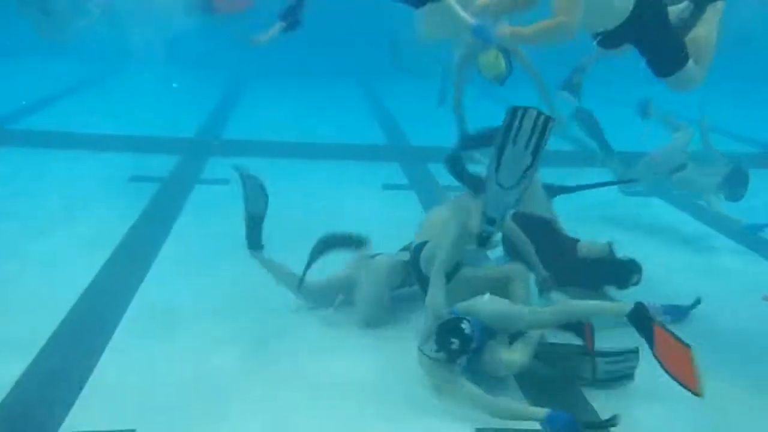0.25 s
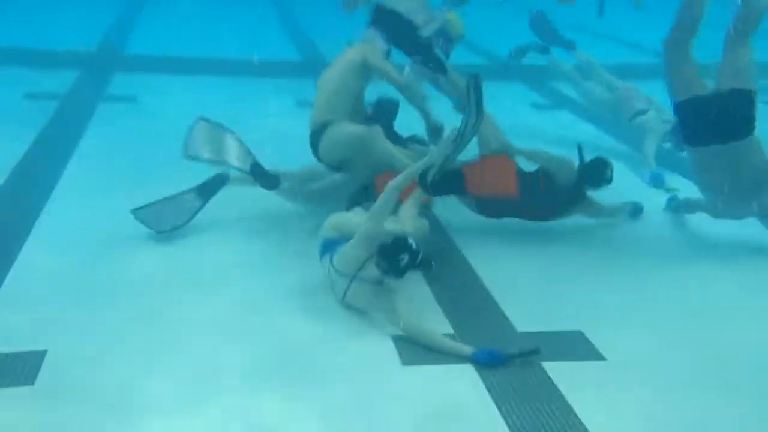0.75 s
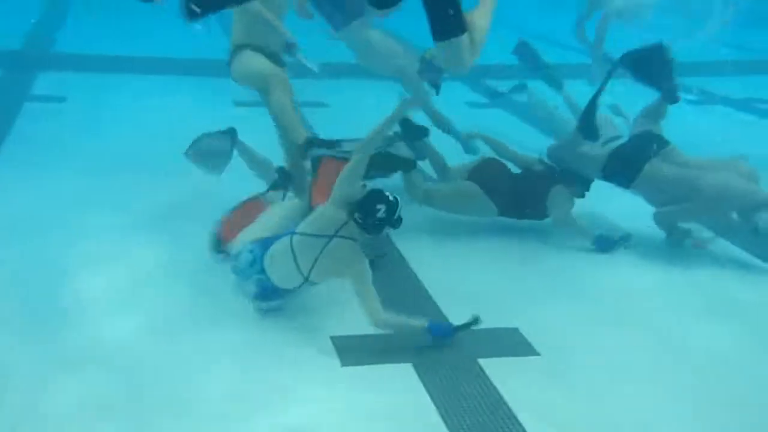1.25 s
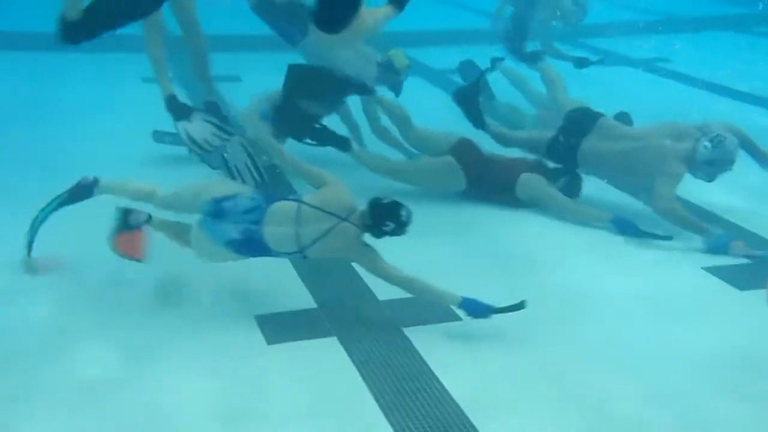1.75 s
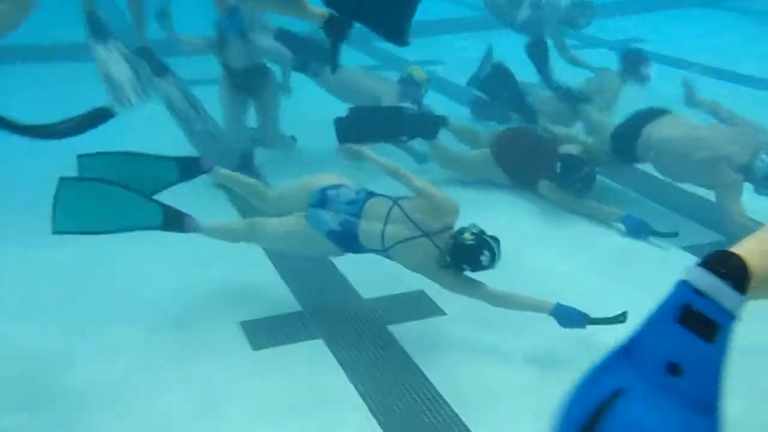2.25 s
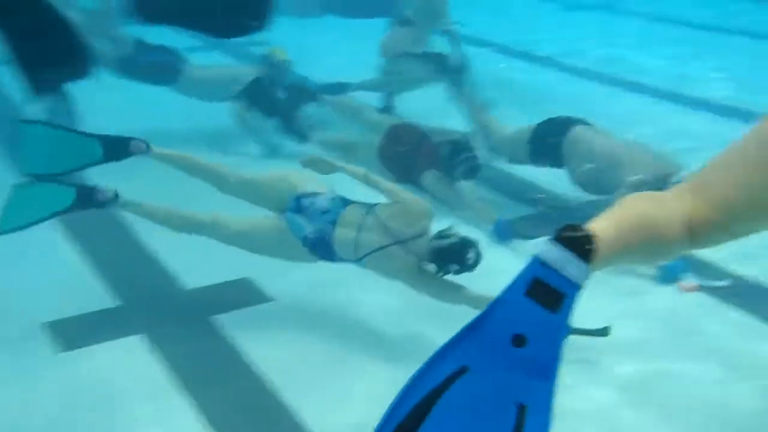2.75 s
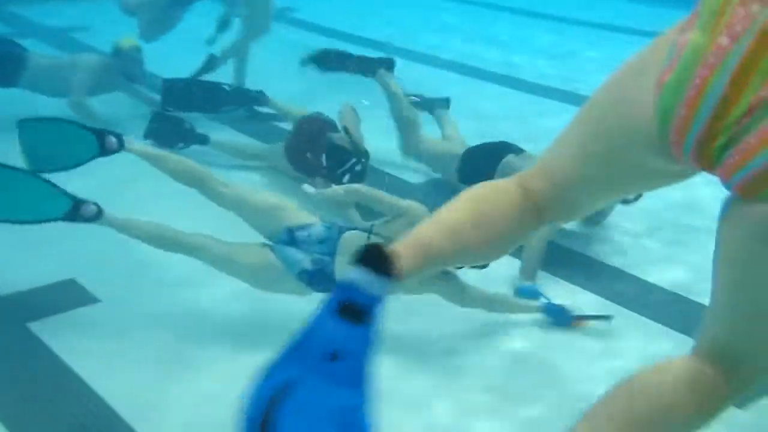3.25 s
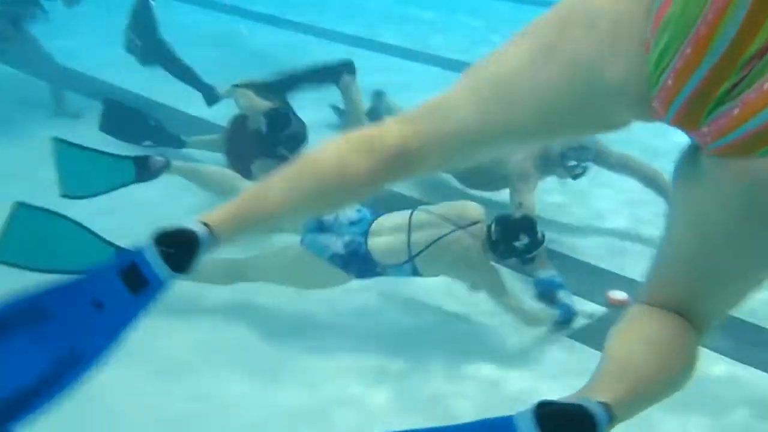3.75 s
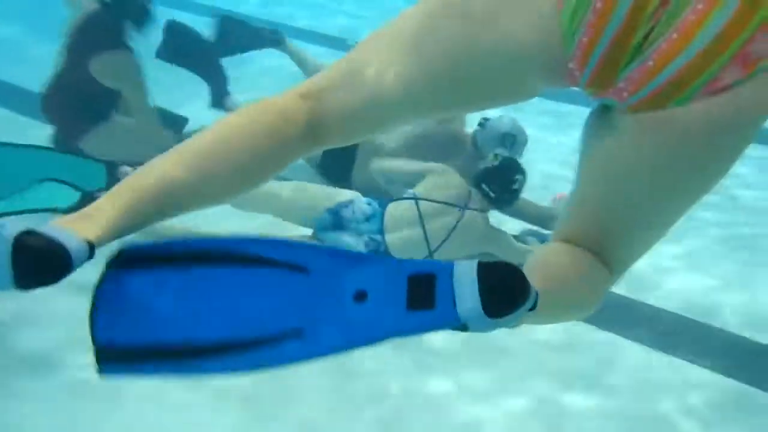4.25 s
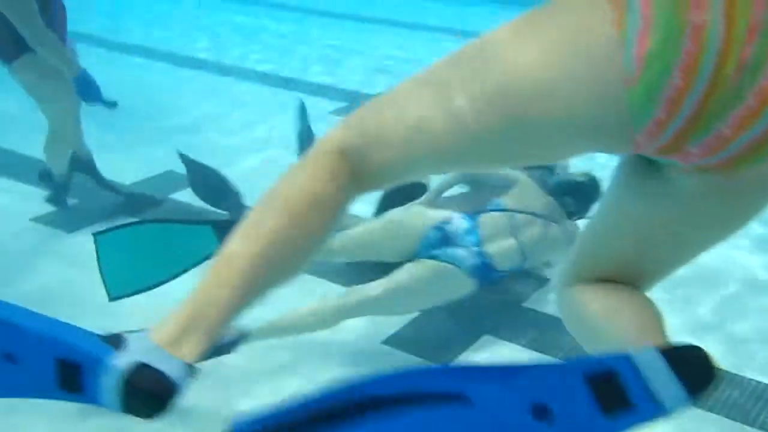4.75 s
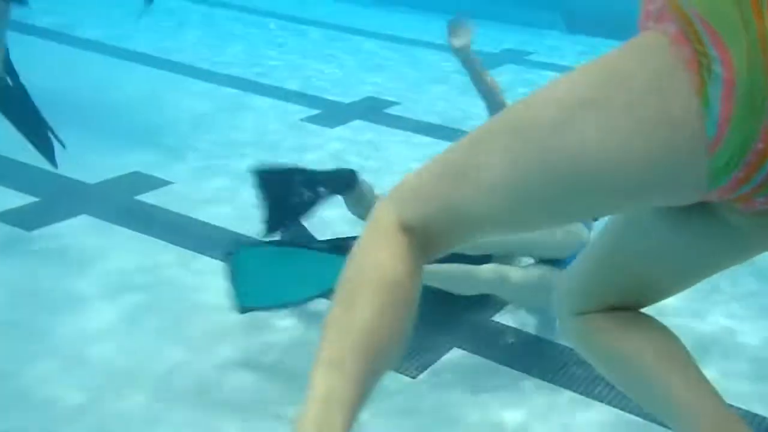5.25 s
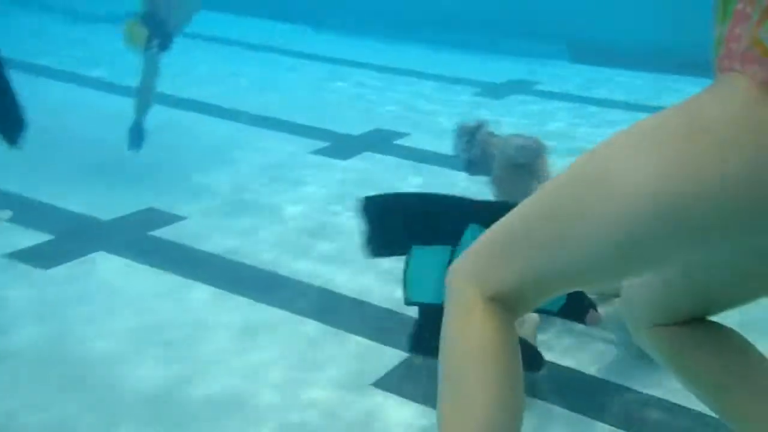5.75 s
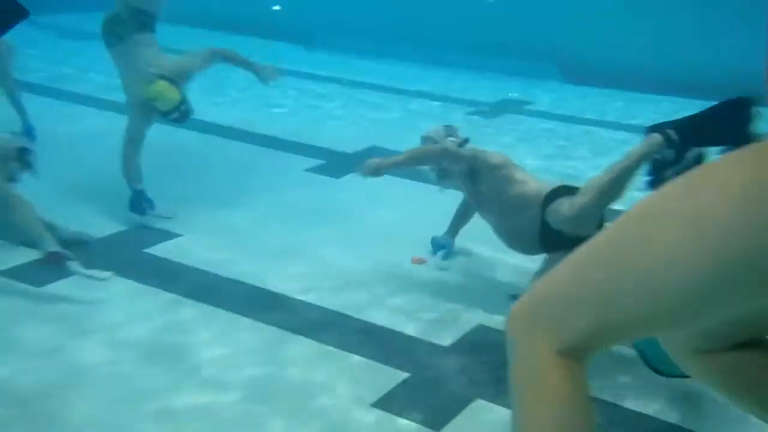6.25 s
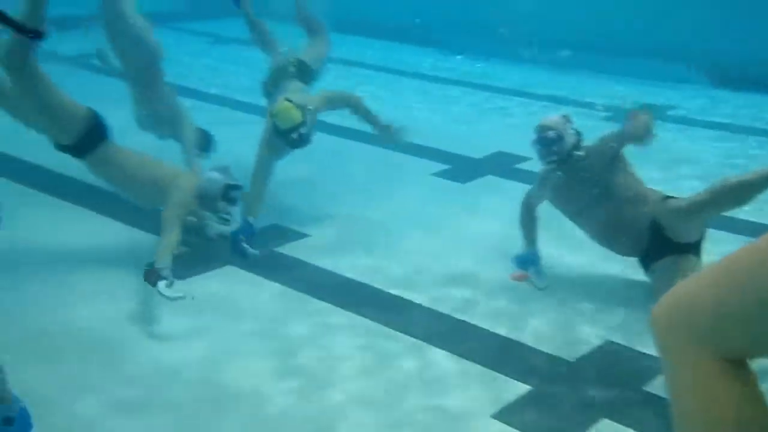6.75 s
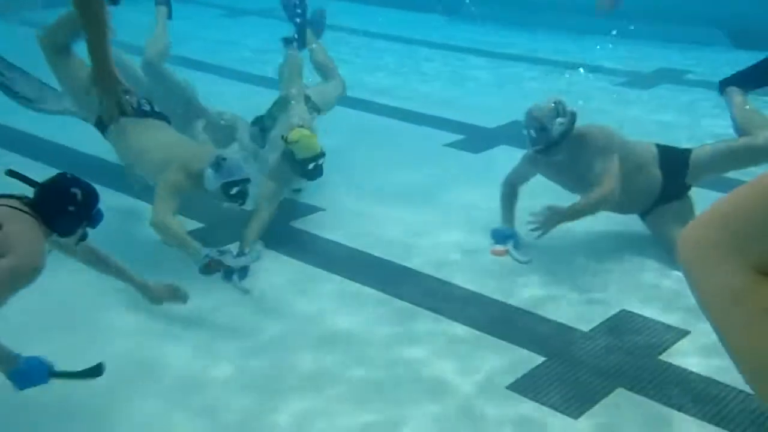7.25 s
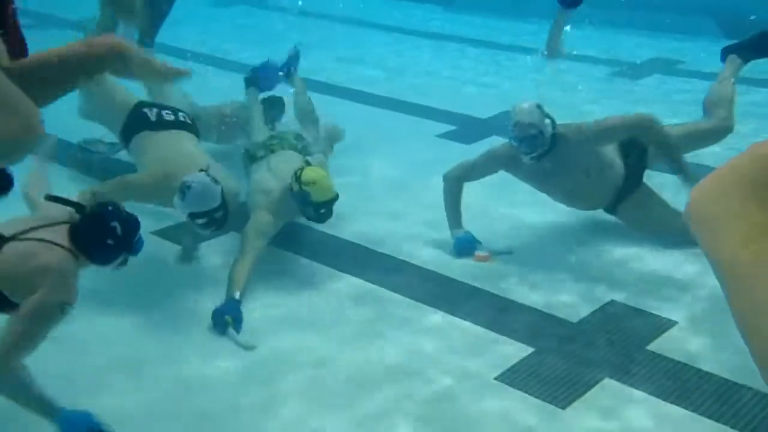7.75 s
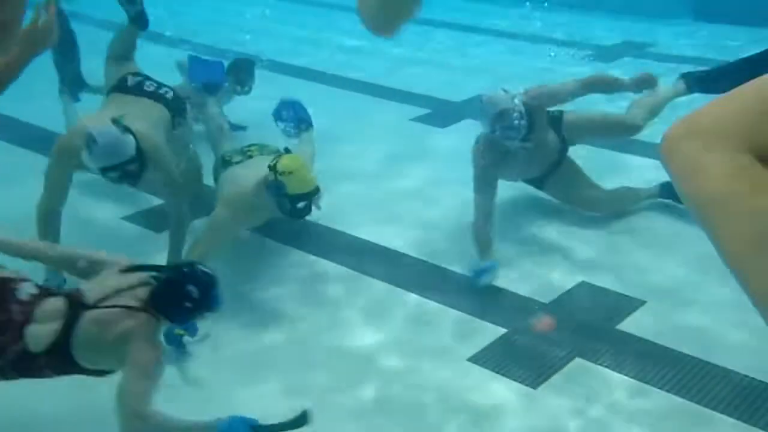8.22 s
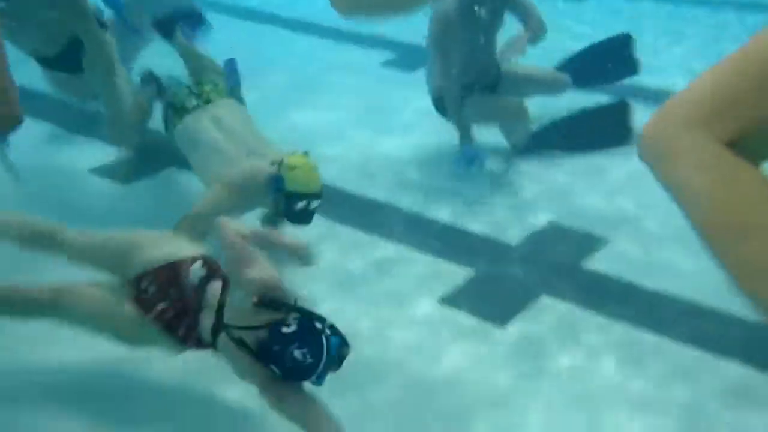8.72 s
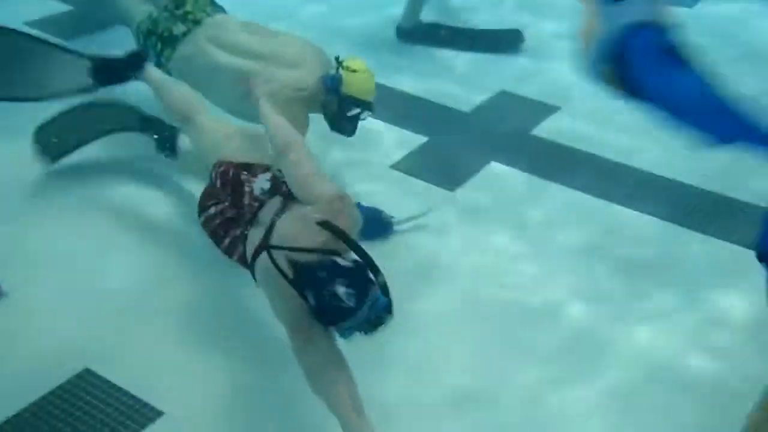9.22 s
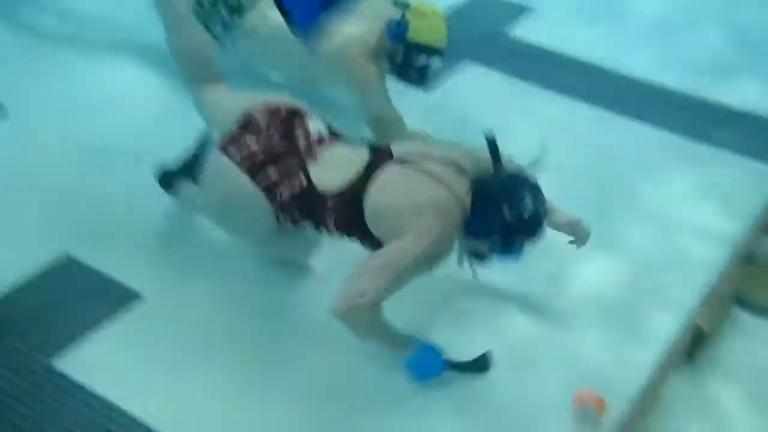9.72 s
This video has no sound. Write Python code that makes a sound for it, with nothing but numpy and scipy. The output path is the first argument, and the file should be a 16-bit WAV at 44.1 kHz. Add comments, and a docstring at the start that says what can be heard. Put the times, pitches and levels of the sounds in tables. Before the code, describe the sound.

Inside a swimming pool, dull clacks and gritty scrapes pepper a murky bubbling hush, while fin strokes shove low water booms against the microphone.

```python
"""Sticks and a puck knock and scrape on pool tiles in an underwater game, heard by a microphone in a small
waterproof housing. Knocks are rattling noise bursts with dying echoes, scrapes are lumpy noise, bubbles are sliding
sines. Fin strokes push water on the housing: swinging tones, with swirling noise that booms near 205 Hz. Behind
lies the pool's wash, coloured noise with far ticks and fizz. Loud pushes overload the input and make its gain duck."""
import sys
import numpy as np
from scipy import signal
from scipy.fft import rfft, irfft
from scipy.io import wavfile
from scipy.ndimage import uniform_filter1d

SR = 44100
rng = np.random.default_rng(int(sys.argv[2]) if len(sys.argv) > 2 else 0)


def output_pcm(signal):
    """Save a mono or channel-first signal as 16-bit PCM at the path in sys.argv[1].

    Samples are clipped to [-1, 1] before scaling.
    """
    pcm = np.clip(np.atleast_2d(signal).T, -1, 1) * 32767
    wavfile.write(sys.argv[1], SR, np.round(pcm).astype(np.int16))


N = 440118


def amp(db):
    """Decibels to an amplitude factor."""
    return 10 ** (np.asarray(db) / 20)


def rms_one(x):
    """Scale a signal to rms 1."""
    return x / np.sqrt(np.mean(x ** 2) + 1e-20)


def in_time(rows):
    """Columns of a curve, one value per sample."""
    time_s, *columns = np.transpose(rows)
    return [np.interp(np.arange(N) / SR, time_s, column) for column in columns]


def drift(corner_hz):
    """Slow random wander of spread 1: noise through two equal low-pass poles, made at every 40th sample."""
    pole = np.exp(-2 * np.pi * corner_hz * 40 / SR)
    noise = rng.standard_normal(N // 40 + 2002)
    slow = signal.lfilter([1], [1, -2 * pole, pole * pole], noise)[2000:]   # skip the filter's start
    return np.interp(np.arange(N) / 40, np.arange(len(slow)), rms_one(slow))


def band(x, low_hz, high_hz):
    """Band-pass with gentle slopes."""
    return signal.sosfilt(signal.butter(2, [low_hz, high_hz], "band", fs=SR, output="sos"), x)


def add(out, start_s, sound):
    """Mix a short sound in at its start time."""
    at = round(start_s * SR)
    out[at:at + len(sound)] += sound[:N - at]


# sticks and puck on the tiles: start_s [s], level_db [dB], treble_db [dB against the level], rattle_s [s]
KNOCKS = [(0.45, -11.5, -14.5, 0.009), (0.58, -15.5, -45, 0.0045), (0.743, -5.5, -28, 0.016),
          (0.874, -10, -38, 0.0066), (1.247, -7.5, -26, 0.0053), (1.252, -10.5, -26, 0.018),
          (1.492, -6.5, -33, 0.0017), (1.786, -12, -52, 0.0057), (1.939, -17, -48, 0.0018),
          (2.178, -15, -42, 0.014), (2.294, -17, -48, 0.0023), (2.402, -9, -36, 0.0014),
          (2.486, -14, -35, 0.0049), (2.494, -14.5, -22, 0.0037), (2.571, -26, -9, 0.0069),
          (2.631, -16, -20, 0.016), (2.654, -16, -25, 0.012), (2.807, -25, -48, 0.0026),
          (3.099, -14, -27, 0.0053), (3.1852, -0.5, -16.5, 0.032), (3.217, -15, -10, 0.013),
          (3.269, -7.5, -15.5, 0.016), (3.452, -23, -19, 0.0072), (3.51, -3, -23, 0.008),
          (3.592, -5, -33, 0.0045), (3.704, -5.5, -63, 0.0074), (3.742, -14, -22, 0.022),
          (3.763, -10.5, -20, 0.0063), (3.864, 7.5, -30.5, 0.0038), (3.892, -9, -38, 0.0015),
          (3.983, -7, -28, 0.0081), (4.034, -3, -47.5, 0.0056), (4.06, -7.5, -44, 0.013),
          (4.163, -16, -16, 0.0028), (4.197, -1, -63, 0.0014), (4.381, -6, -10.5, 0.014),
          (4.397, -18.5, -2.5, 0.014), (4.494, -7, -18, 0.0076), (4.719, -16, -26, 0.0058),
          (4.988, -16.5, -48, .002), (5.052, -16, -49, 0.0052), (5.146, -3, -31.5, 0.0016),
          (5.255, -10.5, -41, 0.004), (5.296, -15.5, -40, .006), (5.548, -24, -42, .003),
          (5.675, -4.5, -49, 0.0011), (5.722, -14.5, -46, .003), (5.78, -17, -29, 0.005),
          (5.822, -6.5, -35, 0.01), (5.934, -3, -16.5, 0.0047), (6.258, -3, -26.5, 0.01),
          (6.537, -26, -45, .003), (6.883, -14.5, -55, 0.0026), (7.289, -20, -24, .002),
          (7.342, -23, -50, .003), (7.525, -15, -52, 0.0088), (7.545, -15.5, -44, 0.0043),
          (7.594, -12, -54, 0.0017), (7.929, -17, -45, 0.0027), (8.014, -20, -15, 0.042),
          (8.197, -9, -57, 0.0032), (8.642, -7.5, -57, 0.0026), (8.712, -14.5, -28.5, 0.0055),
          (8.898, 11.5, -32.5, 0.0068), (8.916, 13.5, -36.5, 0.008), (8.921, 9.5, -50, 0.0039),
          (8.974, -11, -54, 0.0039), (9.037, 0, -49, 0.0029), (9.247, -11, -60, 0.008),
          (9.338, -5, -40.5, 0.0034), (9.399, -17.5, -28, 0.035), (9.533, -4.5, -32, 0.015),
          (9.55, 2, -61, 0.004), (9.646, -7.5, -33, 0.019), (9.765, -19, -10, 0.0026),
          (9.899, -6, -40.5, 0.0071), (9.958, -8, -47, 0.0034)]
THUD_HZ, RING_HZ = 1033, 1318
SOFT_CUT_HZ = 2630   # upper corner of a soft hit's noise


def knocks():
    """A hit rattles for a moment, then its echoes off tiles and surface die; most of the treble dies first."""
    body, soft, thud, treble = np.zeros((4, N))
    t = np.arange(SR // 5) / SR
    for start_s, level_db, treble_db, rattle_s in KNOCKS:
        after = np.maximum(t - max(rattle_s, .001), 0)
        softness = np.clip((-27.0 - treble_db) / 12, 0, 1)   # a hit without treble mostly rings the housing
        rise = np.minimum(t / (.0002 + .0007 * softness), 1)
        echoes = np.exp(-after / 0.0021) + amp(-10.0) * np.exp(-after / 0.011)
        rattle = amp(level_db) * rise * (echoes + amp(-7.5) * np.exp(-t / 0.0026))
        add(body, start_s, (1 - softness) * rattle)
        add(soft, start_s, softness * rattle)
        thud_shape = softness * amp(level_db - 3.0) * rise * np.exp(-t / 0.006)
        add(thud, start_s, thud_shape * np.sin(2 * np.pi * THUD_HZ * t))
        treble_fall = np.exp(-np.maximum(t - 0.43 * rattle_s, 0) / 0.00044)
        treble_tail = amp(-18.0) * np.exp(-after / 0.021)
        add(treble, start_s, amp(level_db + treble_db) * rise * (treble_fall + treble_tail))
    grain = amp(3.4 * drift(190)) * rng.standard_normal(N)
    crack = np.maximum(np.diff(body, prepend=0), 0) * amp(13.0)   # the first contact is one sharp pulse
    hard = signal.lfilter([1, -.7], [1], body * grain + crack)   # a near hit is brighter than the wash
    ring_cycles = RING_HZ * np.arange(N) / SR + 0.2 * drift(70)
    ring = amp(-9.5) * band(body * np.sin(2 * np.pi * ring_cycles), 730, 2000)   # a hard hit's ringing core
    soft_noise = band(band(housing(soft * grain), 850, SOFT_CUT_HZ), 300, SOFT_CUT_HZ)
    dull = ring + band(housing(hard), 330, 4900) + amp(-9.5) * soft_noise
    falling = signal.lfilter([1], [1, -1.64, .68], rng.standard_normal(N))   # noise weaker towards the top
    bright = band(treble * falling * amp(3.0 * drift(300)), 1500, 8500)
    return amp(-5) * dull + thud + amp(-14.5) * bright


# gritty scrapes on the tiles: start_s [s], level_db [dB], centre_hz [Hz], length_s [s]
SCRAPES = [(1.007, -34.5, 2530, 0.021), (1.192, -51, 3880, 0.016), (1.673, -32, 2470, 0.028),
           (1.676, -40, 3800, .01), (2.628, -40, 4100, 0.01), (2.652, -47, 4200, 0.014),
           (2.951, -62, 9500, 0.017), (2.948, -55, 4900, 0.022), (2.985, -47.5, 3900, 0.015),
           (5.828, -47, 3520, 0.015), (6.498, -34.5, 2180, 0.0086), (7.043, -35, 2400, 0.018),
           (8.853, -23, 3440, 0.0035), (9.494, -53, 4520, 0.011), (9.521, -25.5, 2650, 0.014),
           (9.631, -24.5, 2250, 0.018), (9.656, -52, 4470, 0.0043), (9.76, -16, 2100, 0.0036)]
SCRAPE_OCTAVES, SCRAPE_FALL = 0.36, 0.73   # half width of the band; decay time as a share of the length


def scrapes():
    """A short drag over grit: lumpy noise in a band of its own."""
    out, t = np.zeros(N), np.arange(SR // 10) / SR
    grit = amp(4.5 * drift(200)) * rng.standard_normal(N)
    for start_s, level_db, centre_hz, length_s in SCRAPES:
        swell = np.minimum(t / 0.0032, 1) ** 2
        fall = np.exp(-np.maximum(t - length_s, 0) / (SCRAPE_FALL * max(length_s, .002)))
        edges = centre_hz / 2 ** SCRAPE_OCTAVES, centre_hz * 2 ** SCRAPE_OCTAVES
        piece = np.resize(grit[round(start_s * SR):], len(t))
        add(out, start_s, amp(level_db) * swell * fall * rms_one(band(band(piece, *edges), *edges)))
    return out


# fin strokes push water on the housing: start_s [s], level_db [dB], pitch_hz [Hz], length_s [s]
PUSHES = [(1.238, -20.5, 205, 0.033), (2.385, -15.5, 220, 0.015), (2.639, -25, 157, 0.013),
          (3.503, -12.5, 222, 0.011), (3.578, 0, 133, 0.01), (3.596, -8, 154, 0.0098),
          (3.643, -14.5, 205, 0.039), (3.741, -0.5, 216.5, 0.013), (3.766, -1, 173, 0.017),
          (3.78, 0, 211, 0.015), (3.819, 10, 203, 0.036), (3.863, 1, 219, 0.029), (3.899, -4.5, 205, 0.032),
          (3.936, 5, 206, 0.018), (4.019, 0, 207, 0.015), (4.066, 1, 142, 0.012), (4.106, -6, 205, 0.018),
          (4.152, 1, 214, 0.016), (4.633, -9.5, 166, 0.012), (4.814, -19, 160, 0.016),
          (4.939, -6, 124, 0.0064), (4.984, -6, 169, 0.0041), (5.077, -1, 166, 0.0092),
          (5.347, -16, 154, 0.019), (5.936, -13, 205, 0.022), (6.056, -21, 148, 0.023),
          (6.389, -18, 205, 0.028), (6.631, -17, 211, 0.025), (6.852, -19, 210, 0.029),
          (7.051, -13, 207, 0.025), (7.298, -17.5, 226, 0.014), (7.921, -18, 147, 0.031),
          (8.105, -12.5, 212, 0.028), (8.372, -15.5, 162, 0.021), (8.488, 3.5, 205, 0.017),
          (8.532, -0.5, 205, 0.0033), (8.578, -4, 171, 0.014), (8.621, -7.5, 198, 0.029),
          (8.721, -9, 187, 0.019), (8.788, 0.5, 196, 0.0041), (8.799, 3, 216, 0.026),
          (8.813, 5.5, 105.4, 0.024), (8.869, 10, 132, 0.007), (8.891, 12, 131, 0.042),
          (8.95, 10.5, 135, 0.019), (8.984, 0, 176, 0.062), (9.039, 9.5, 128, 0.02),
          (9.074, 5.5, 147, 0.015), (9.106, 2, 114.3, 0.052), (9.171, 1.5, 139, 0.026),
          (9.216, -12, 196, 0.042), (9.256, 5.5, 195, 0.012), (9.309, -3.5, 205, 0.015),
          (9.368, 2, 205, 0.014), (9.436, -4.5, 207, 0.014), (9.513, -2, 193, 0.014), (9.543, 7, 205, 0.01),
          (9.614, -6, 194, 0.05), (9.67, 2, 187, 0.0095), (9.692, -10, 198, 0.033),
          (9.748, -15, 202, 0.044), (9.812, -15.5, 205.3, 0.062), (9.96, -16, 205, .02),
          (9.895, -10.5, 223, 0.026)]


def pushes():
    """Each push swings the housing wall unevenly: quick swell, hold, short ring-out, a ragged slap on top."""
    out, slap, t = np.zeros(N), np.zeros(N), np.arange(SR // 4) / SR
    cycles_off = 0.047 * drift(27)
    for start_s, level_db, pitch_hz, length_s in PUSHES:
        shape = np.minimum(t / 0.0037, 1) * np.exp(-np.maximum(t - max(length_s, .005), 0) / 0.0062)
        wander = np.resize(cycles_off[round(start_s * SR):], len(t))
        add(out, start_s, amp(level_db) * shape * np.sin(2 * np.pi * (pitch_hz * t + wander)))
        add(slap, start_s, amp(level_db - 23.5) * np.minimum(t / 0.0056, 1) * np.exp(-t / 0.0088))
    return out + slap * rms_one(band(rng.standard_normal(N), 290, 600))


WAKE_DB, WAKE_RISE_S, WAKE_FALL_S = -12, 0.0089, 0.017   # boom wake against its push
DEEP_WAKE_DB, DEEP_WAKE_FALL_S = -15, 0.016   # rumble wake against a push at 150 Hz
DEEP_WAKE_DB_PER_HZ = 0.0608   # higher-pitched pushes stir the deep rumble more


def wakes(levels_db, fall_s):
    """Summed envelope of the wakes that the pushes leave in the swirl."""
    out, t = np.zeros(N), np.arange(SR // 2) / SR
    for (start_s, *_), level_db in zip(PUSHES, levels_db):
        add(out, start_s, amp(level_db) * np.minimum(t / WAKE_RISE_S, 1) * np.exp(-t / fall_s))
    return out


# water swirling round the housing, before wakes are added: time_s [s], boom_db [dB], deep_db [dB]
SWIRL = [(0, -34, -27), (.33, -28, -27), (.8, -32.5, -35), (3.08, -32, -36.5), (3.5, -31.5, -36),
         (3.72, -28.5, -23), (3.86, -20, -6), (3.95, -26, -8), (4.2, -27.5, -31.5), (4.89, -28.5, -33),
         (5.2, -23.5, -27), (5.5, -28, -34.5), (6.6, -25, -35.5), (7.86, -30.5, -37), (8.44, -24.5, -28),
         (8.6, -17, -24), (8.76, -24.5, -27.5), (8.85, -2.5, -9), (9.2, -10.5, -14.5), (9.98, -20.5, -46.5)]
BOOM_HZ, BOOM_WIDTH_HZ = 205, 61


def swirl():
    """Turbulence in lumps: it drives the housing's boom mode and a deep rumble below it."""
    boom_db, deep_db = in_time(SWIRL)
    _, push_db, push_hz, _ = np.transpose(PUSHES)
    boom_level = amp(boom_db) + wakes(push_db + WAKE_DB, WAKE_FALL_S)
    deep_wake_db = push_db + DEEP_WAKE_DB + DEEP_WAKE_DB_PER_HZ * (push_hz - 150)
    deep_level = amp(deep_db) + wakes(deep_wake_db, DEEP_WAKE_FALL_S)
    r, w = np.exp(-np.pi * BOOM_WIDTH_HZ / SR), 2 * np.pi * BOOM_HZ / SR   # resonator radius and angle
    lumps = band(rng.standard_normal(N) * amp(2.75 * drift(54)), 120, 225.5)
    boom = signal.lfilter([1, 0, -1], [1, -2 * r * np.cos(w), r * r], lumps)
    deep = band(band(rng.standard_normal(N) * amp(2.0 * drift(3.7)), 74.3, 160), 34, 160)
    # the swirl tears off large bubbles
    large_bubbles = band(fizz(130, 277.6, 820, cycles=36.0), 150, 1300)
    gurgle = amp(-17.0) * boom_level ** 0.79 * large_bubbles
    # slow pressure of the waves above follows the wash, a little stronger in a swirl
    surface_db, = in_time(POOL)
    heave_level = amp(-2.0 + surface_db) * deep_level ** 0.058
    heave = heave_level * rms_one(band(rng.standard_normal(N), 23, 55))
    return boom_level * rms_one(boom) + deep_level * rms_one(deep) + gurgle + heave


# single bubbles: start_s [s], level_db [dB], pitch_hz [Hz], swell_s [s], t60_s [s], slide_hz_per_s [Hz/s]
BUBBLES = [(0.215, -20, 421, 0.0037, 0.21, 284), (1.014, -21.5, 2210, 0.0024, 0.041, 1008),
           (1.161, -20, 1152, 0.0089, 0.13, 2991), (4.735, -15, 1515, 0.011, 0.079, 5998),
           (4.756, -24.5, 1890, 0.01, 0.034, 39994), (5.204, -21.5, 423, 0.0029, 0.22, 999),
           (8.29, -26.5, 374, 0.044, .2, 99), (8.489, -10, 481, 0.0051, 0.07, 498.5),
           (8.636, -9.5, 358, 0.0062, 0.052, 494), (8.819, -13, 2050, 0.0035, 0.044, 1001),
           (9.66, -19.5, 2400, 0.046, 0.06, -1500)]


def bubbles():
    """A bubble swells, then rings out as an unsteady sine that slides in pitch."""
    out, t = np.zeros(N), np.arange(SR // 5) / SR
    cycles_off = .07 * drift(60)
    for start_s, level_db, pitch_hz, swell_s, t60_s, slide_hz_per_s in BUBBLES:
        shape = np.minimum(t / swell_s, 1) * amp(-60 * np.maximum(t - swell_s, 0) / t60_s)
        wander = np.resize(cycles_off[round(start_s * SR):], len(t))
        cycles = t * (pitch_hz + slide_hz_per_s * t / 2) + wander
        add(out, start_s, amp(level_db) * shape * np.sin(2 * np.pi * cycles))
    return out * amp(2.5 * drift(60))


def fizz(per_s, low_hz, high_hz, cycles):
    """Bubbles born at random, each ringing some cycles at one of 16 pitches; rms 1."""
    births = rng.random(N) < per_s / SR
    sizes = amp(6.34 * np.minimum(rng.exponential(1, N), 3)) * births + 1e-18
    dealt, out = rng.integers(0, 16, N), 0
    for k, pitch_hz in enumerate(np.geomspace(low_hz, high_hz, 16)):
        r, w = amp(-60 * pitch_hz / (cycles * SR)), 2 * np.pi * pitch_hz / SR   # falls 60 dB in those cycles
        out = out + signal.lfilter([0, np.sin(w)], [1, -2 * r * np.cos(w), r * r], sizes * (dealt == k))
    return rms_one(out)


# level of the pool's wash: time_s [s], level_db [dB]
POOL = [(0, -32.5), (2.1, -34.5), (3.2, -33.5), (4.6, -32.5), (5.3, -30), (5.9, -30.5), (7.6, -33.5),
        (8.4, -32.5), (8.75, -29.5), (9.98, -31)]


def pool():
    """Reverberant wash of the whole pool in separately swelling noise bands, with brief far ticks and small bubbles."""
    wash_db, = in_time(POOL)
    edges_hz = [20, 700, 1800, 3700, 16000]
    patches = np.zeros(N)
    for low_hz, high_hz in zip(edges_hz, edges_hz[1:]):
        swell_db = 1.7 * drift(6.7) + 0.41 * drift(2.0)
        patches += band(rng.standard_normal(N), low_hz, high_hz) * amp(swell_db)
    wash = rms_one(patches) * amp(1.13 * drift(20))
    tick_starts = rng.random(N) < 60 / SR   # about 60 per second
    sizes = amp(1.8 * np.minimum(rng.exponential(1, N), 4)) * tick_starts
    fade = np.exp(-1 / (0.0009 * SR))
    ticks = signal.lfilter([1], [1, -fade], sizes) * rng.standard_normal(N)
    small_bubbles = fizz(450, 900, 5000, cycles=55.0)
    return amp(wash_db) * housing(wash + amp(-15) * ticks + amp(-13.5) * small_bubbles)


# what the housing lets through to the microphone: frequency_hz [Hz], level_db [dB]
HOUSING = [(150, -24), (280, -9), (430, 0.5), (600, -6), (980, 0), (1250, 0.5), (1600, -12), (2300, -12.5),
           (3000, -23), (4500, -37), (6500, -48.5), (14000, -74.5)]
# narrow peaks and notches on top of that: centre_hz [Hz], half_width_hz [Hz], level_db [dB]
RIPPLES = [(492.5, 63, -9), (740.6, 63, -10), (1839, 120, -10.5), (3264, 237, 8.5), (3730, 150, -3.5),
           (4070, 160, 3.5), (4770, 110, 3.5)]


def housing(x):
    """Causal (minimum-phase) filter with the housing's colour; white noise keeps its rms."""
    size = 4096
    hz = np.arange(size // 2 + 1) * SR / size + 1   # 1 Hz up, so that the logarithm exists
    curve_hz, curve_db = np.transpose(HOUSING)
    colour_db = np.interp(np.log(hz), np.log(curve_hz), curve_db)
    for centre_hz, half_width_hz, level_db in RIPPLES:
        colour_db = colour_db + level_db * np.exp(-((hz - centre_hz) / half_width_hz) ** 2)
    # folding the cepstrum forward makes the phase minimal
    cepstrum = irfft(np.log(amp(colour_db)))
    cepstrum[1:size // 2] *= 2
    cepstrum[size // 2 + 1:] = 0
    pulse = irfft(np.exp(rfft(cepstrum)))
    return signal.fftconvolve(x, pulse / np.sqrt(np.sum(pulse ** 2)))[:N]


def scene():
    """Everything that reaches the microphone, as one channel."""
    return (knocks() + scrapes() + pushes() + swirl() + bubbles() + pool())[None]


LIFT_HZ, CUTOFF_HZ = 755, 14500   # corner of the treble lift; start of the top's stop band


def record(dry):
    """Late-biting, slowly recovering gain control, lopsided overload inside a treble lift and cut, hiss, top cut."""
    t = np.arange(N) / SR
    level_db = 10 * np.log10(uniform_filter1d(dry[0] ** 2, size=2000) + 1e-12)
    over_db = np.maximum(level_db + 11.5, 0)
    release = 41.8   # fall of the held excess, dB per s
    held_db = np.maximum.accumulate(over_db + release * t) - release * t
    bite = np.exp(-1 / (.06 * SR))
    gain = amp(-.9 * signal.lfilter([1 - bite], [1, -bite], held_db))
    pole = np.exp(-2 * np.pi * LIFT_HZ / SR)
    lifted = signal.lfilter([1, -pole], [1 - pole], dry * gain)
    top = np.where(lifted > 0, .64, .57)   # the two sides clip at different heights
    x = lifted / top
    flattened = top * x / (1 + np.abs(x) ** 14) ** (1 / 14)
    clipped = signal.lfilter([1 - pole], [1, -pole], flattened)
    # the coupling, a 12 Hz high-pass, tilts the flat tops
    clipped = signal.lfilter([1, -1], [1, -np.exp(-2 * np.pi * 12 / SR)], clipped)
    hiss = amp(-73.5) * rng.standard_normal(N) * gain   # faint electronic hiss, ducked as well
    return signal.sosfilt(signal.cheby2(24, 60, CUTOFF_HZ, fs=SR, output="sos"), clipped + hiss)


dry = scene()
out = record(dry)
output_pcm(out)
```